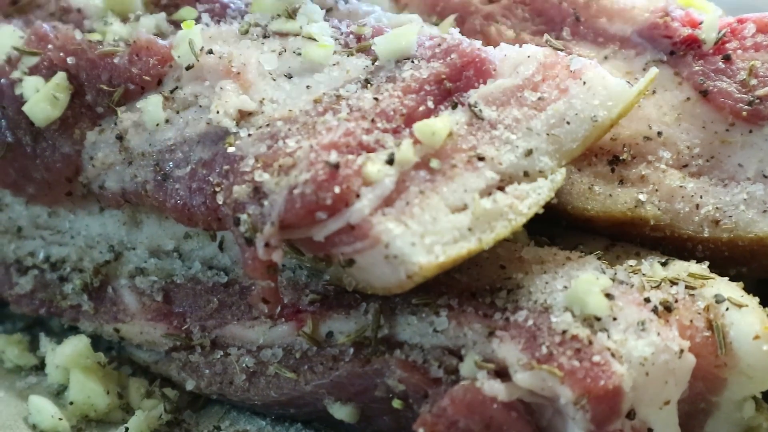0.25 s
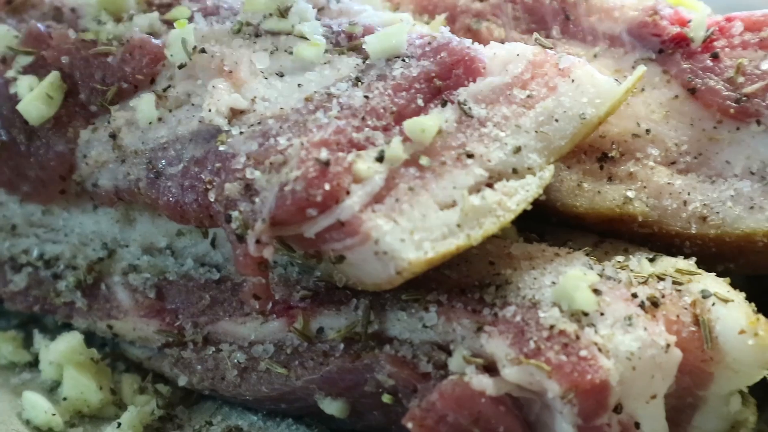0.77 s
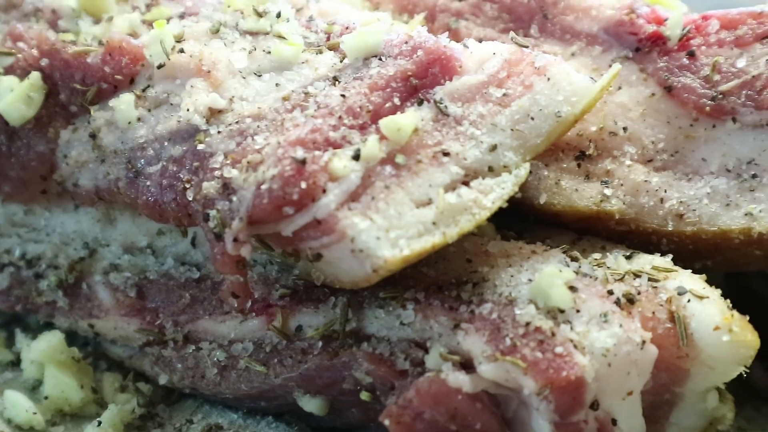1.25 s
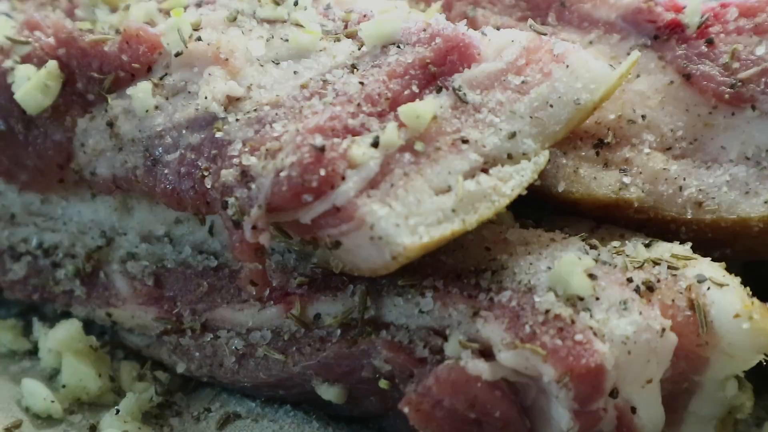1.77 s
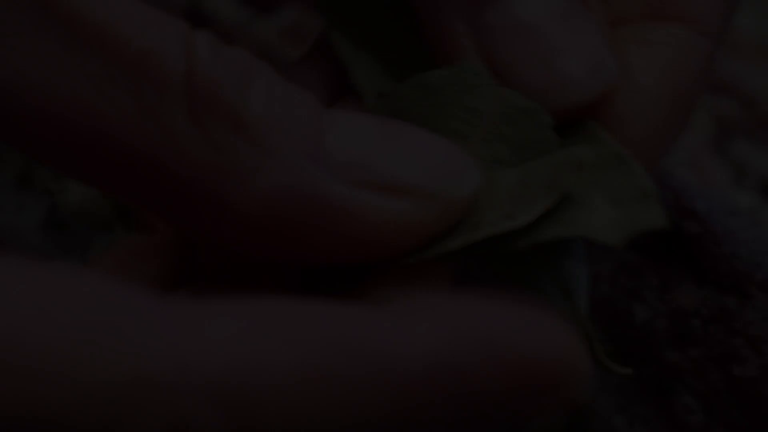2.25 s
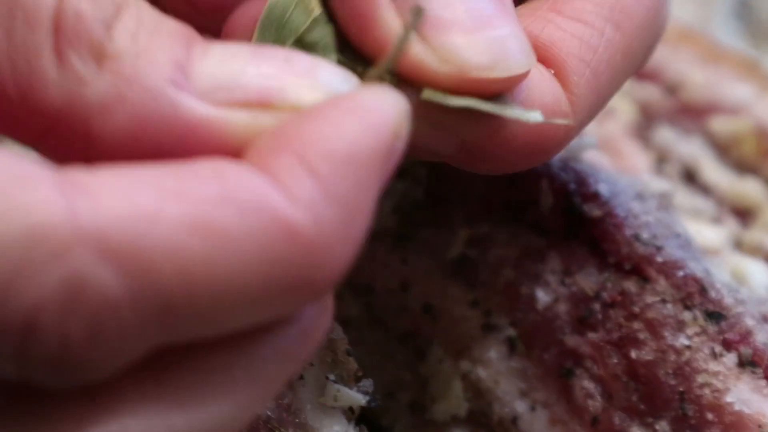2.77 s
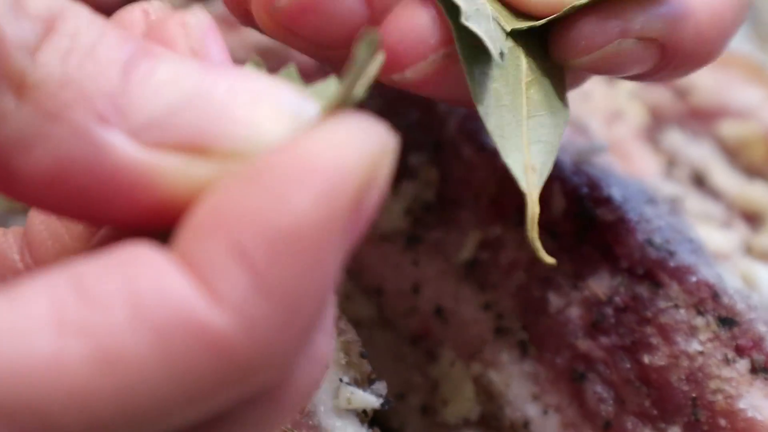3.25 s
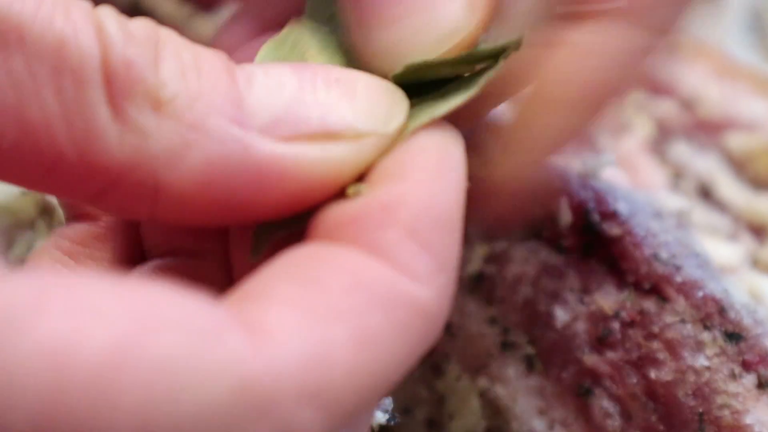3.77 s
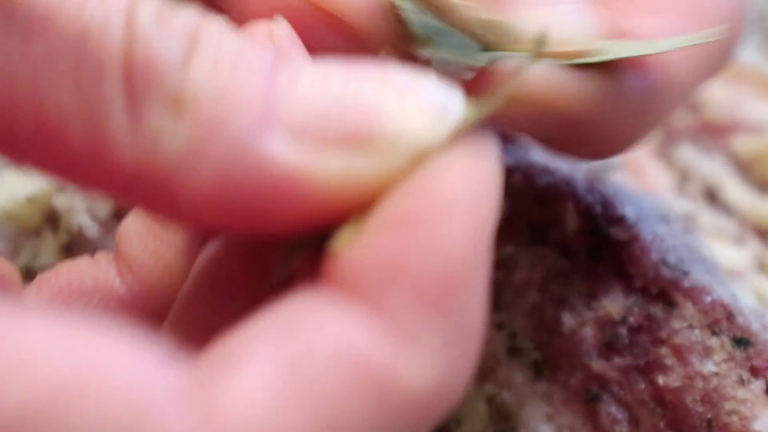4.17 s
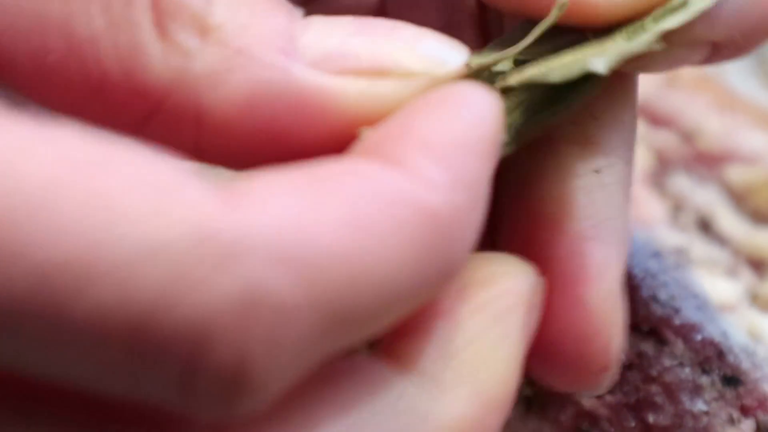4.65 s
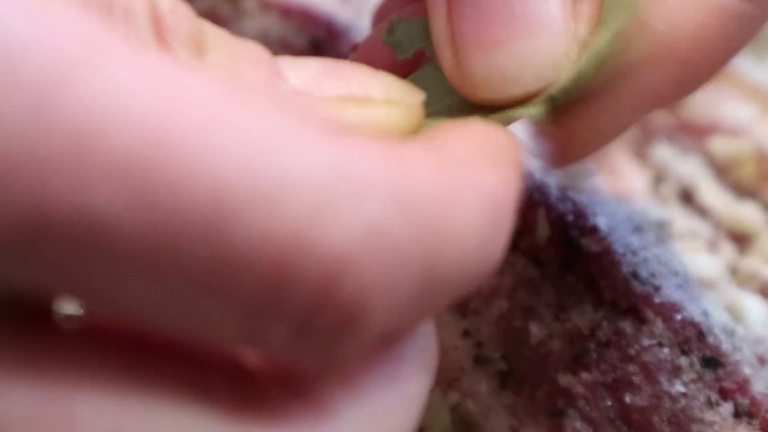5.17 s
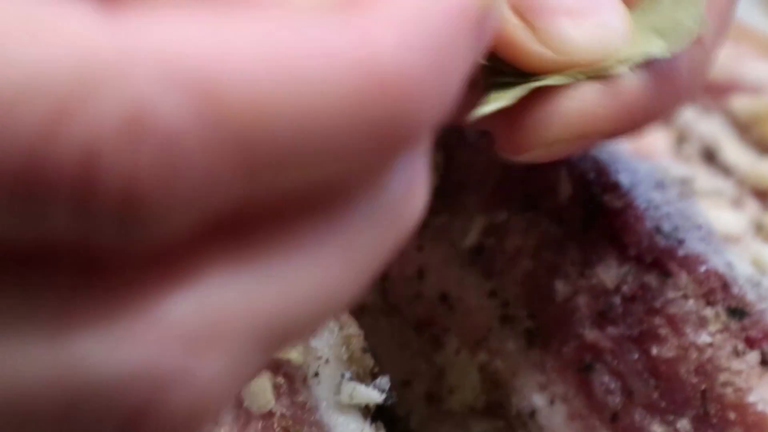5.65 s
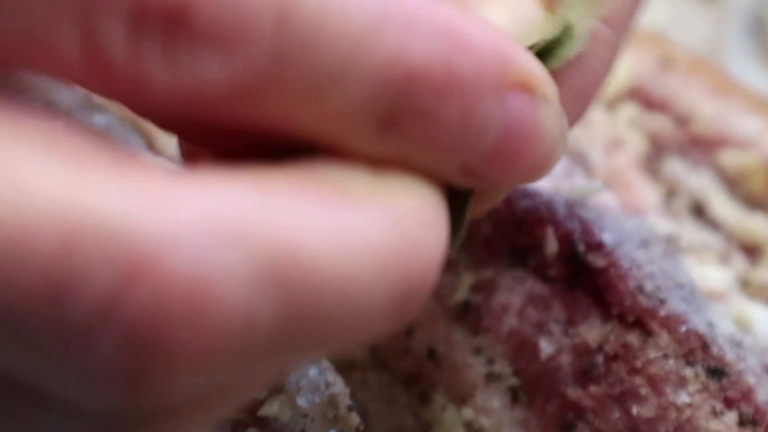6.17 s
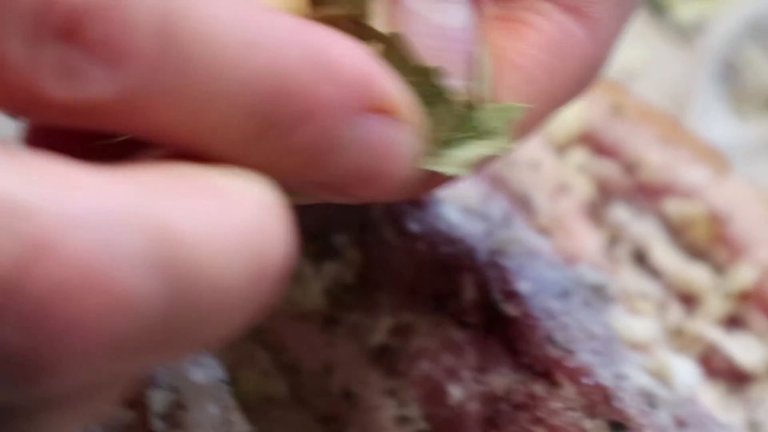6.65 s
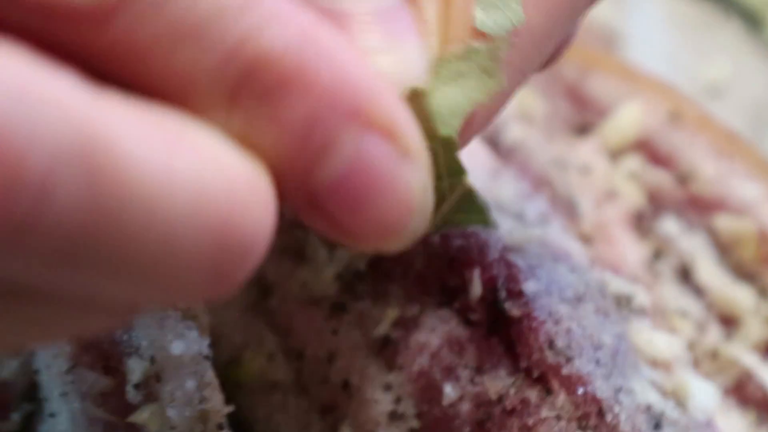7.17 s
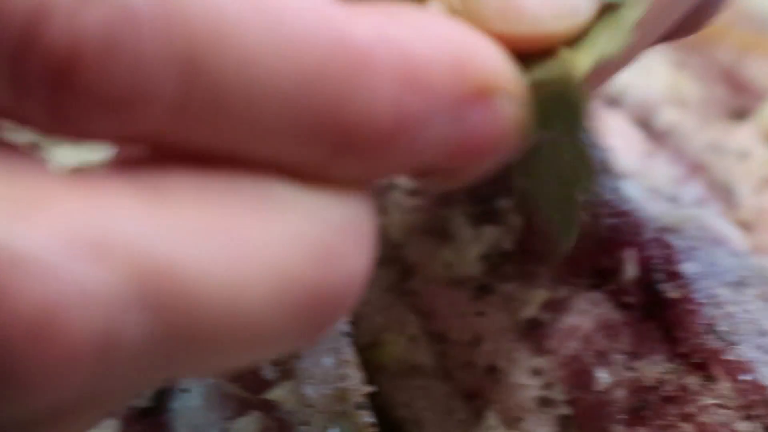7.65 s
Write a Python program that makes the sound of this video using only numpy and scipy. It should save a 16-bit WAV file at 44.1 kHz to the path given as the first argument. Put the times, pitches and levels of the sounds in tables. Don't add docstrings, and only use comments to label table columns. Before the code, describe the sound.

After faint patters of sprinkled seasoning, fingers crumble dry leaves up close in uneven bursts of sharp, crisp cracks and papery rustling in a quiet kitchen.

```python
import sys
import numpy as np
from scipy import signal
from scipy.fft import rfft, irfft, next_fast_len
from scipy.io import wavfile
from scipy.ndimage import uniform_filter1d, minimum_filter1d, map_coordinates

SR = 44100
rng = np.random.default_rng(int(sys.argv[2]) if len(sys.argv) > 2 else 0)


def wrap_up_sound(samples):
    columns = np.atleast_2d(samples).T
    tamed = np.clip(columns, -1, 1)
    steps = np.round(tamed * 32767).astype(np.int16)
    wavfile.write(sys.argv[1], SR, steps)


def decibels_to_gain(level_db):
    exponent = np.asarray(level_db, float) / 20
    return 10 ** exponent


N = 349272

# pitch_hz, density_db [dB per Hz]
AIR_SPECTRUM = [(15, -36), (25, -15), (49, -11), (326, 0), (3090, -6), (9520, -24.5), (11500, -23),
                (12800, -47), (15000, -53)]
# pitch_hz, side_over_mid_db
FAR_WIDTH = [(40, -5), (150, 10), (700, 5.5), (1290, 5.5), (2380, -0.5), (8120, -2.5), (15000, -2)]
# pitch_hz, t60_s
WALL_DECAY = [(500, 0.14), (2000, 0.16), (6000, 0.12), (14000, 0.014)]
# start_s, peak_db
VEIN_THUMPS = [
    (2.196, -56),
    (2.503, -50.5),
    (5.739, -53),
    (6.66, -51),
    (6.84, -53),
]
# start_s, peak_db, pitch_hz, decay_cycles [cycles to -60 dB]
HAND_BUMPS = [(2.141, -32, 210, 3.4), (2.291, -36, 238, 9.4), (2.5, -23, 265, 5), (4.749, -26, 190, 4),
              (4.7792, -14, 191, 2.5), (5.161, -24.5, 250, 7.1), (6.656, -29, 110, 3.3),
              (6.70, -36, 170, 3.8), (6.786, -29, 180, 4.8), (6.826, -23, 260, 3.1), (6.874, -20, 220, 2.3),
              (7.224, -19, 196, 4.3), (7.223, -19, 420, 5.1), (7.315, -28, 250, 2.7), (7.38, -27.5, 245, 8)]
# time_s, level_db
HAND_GRIP = [(1.9, -85), (2.15, -70), (2.6, -75.5), (3.4, -80), (4.0, -68), (4.6, -68), (5.0, -76),
             (5.45, -64.5), (5.7, -71.5), (6.2, -69), (6.8, -63.5), (7.05, -68.5), (7.25, -64),
             (7.45, -65.5), (7.92, -66.5)]
# pitch_hz, density_db [dB per Hz]
SKIN_SPECTRUM = [(18, -43), (30, -54), (90, -13.5), (314, -2.5), (394, -4), (587, -7), (900, -5.5),
                 (1170, -49), (1980, -120)]
# start_s, length_s, level_db
SEASONING_SHAKES = [
    (0, 0.089, -69),
    (0.195, 0.11, -65),
    (0.383, 0.39, -66),
    (0.94, 0.32, -65.5),
    (1.152, 0.062, -59.5),
    (1.298, 0.34, -66),
]
# pitch_hz, density_db [dB per Hz]
GRAIN_SPECTRUM = [(710, -14), (1200, -10), (2000, -5), (3500, -8.5), (6000, -6), (9000, -11),
                  (14200, -21.5), (16000, -40)]
# start_s, length_s, pitch_hz, level_db
EDGE_SCRAPES = [
    (4.39, 0.078, 3850, -55.5),
    (7.353, 0.048, 1190, -55),
    (7.434, 0.026, 1140, -45),
]
# pitch_hz, side_over_mid_db
CLOSE_WIDTH = [(60, -13), (380, -7.5), (700, -5), (2380, -4.5), (4400, -2.5), (15000, -1)]
# pitch_hz, density_db [dB per Hz]
RUB_SPECTRUM = [(150, -52), (500, -9.5), (1200, -6), (1600, -1.5), (2400, -1.5), (3000, -9), (5000, -10),
                (16000, -43.5)]
# pitch_hz, density_db [dB per Hz]
CRACK_SPECTRUM = [(300, -47.5), (1470, -18), (2500, -14.5), (2880, -2.5), (4240, 0.5), (7550, -2),
                  (11000, -7), (15400, -16.5), (16500, -31.5)]
# pitch_hz, gain_db
FLAKE_RADIATION = [(20, -75.5), (200, -12.5), (450, -6.5), (700, -1), (16000, 5.5), (17000, -9)]
# release_s, build_up_s, rubbing_db, crackle_db
EARLY_SQUEEZES = [(2.0, 0.072, -57, -72), (2.13, 0.21, -55.5, -59), (2.34, 0.056, -46, -61),
                  (2.471, 0.18, -54, -62.5), (2.66, 0.2, -49, -66), (2.702, 0.074, -38.5, -53),
                  (2.85, 0.03, -42, -34), (3.14, 0.12, -43, -51.5), (3.74, 0.074, -45, -64),
                  (3.87, 0.23, -48, -60.5), (3.943, 0.1, -46, -67), (4.05, 0.065, -49, -66),
                  (4.164, 0.053, -44.5, -45.5), (4.285, 0.05, -38, -46), (4.453, 0.063, -56, -69.5),
                  (4.609, 0.034, -45.5, -55), (4.707, 0.03, -49, -74), (4.93, 0.13, -51.5, -60),
                  (5.12, 0.27, -49, -61.5), (5.231, 0.16, -48.5, -74)]
# release_s, build_up_s, rubbing_db, crackle_db
LATE_SQUEEZES = [(5.299, 0.025, -48, -41), (5.443, 0.075, -35, -34), (5.671, 0.082, -50, -44.5),
                 (5.767, 0.18, -42.5, -50.5), (5.93, 0.15, -45.5, -52.5), (6.117, 0.14, -47, -43),
                 (6.351, 0.078, -63, -40.5), (6.45, 0.24, -73, -50), (6.599, 0.2, -46, -53),
                 (6.844, 0.15, -46, -41.5), (7.091, 0.07, -46.5, -48.5), (7.211, 0.053, -45.5, -40.5),
                 (7.32, 0.12, -56, -49), (7.53, 0.12, -49.5, -55), (7.63, 0.14, -55, -46),
                 (7.82, 0.086, -49.5, -51), (7.91, 0.13, -46.5, -48.5)]
# start_s, flake_hz, ring_peak_db, splinter_hz, crack_peak_db
FOLD_FRACTURES = [(1.9793, 2390, -42, 4700, -39.5), (2.0634, 1440, -34, 6800, -33.5),
                  (2.0828, 1580, -41, 4200, -50), (2.1108, 1590, -50, 4000, -25),
                  (2.1171, 1970, -29.5, 7300, -45), (2.1249, 1590, -39, 3480, -27.5),
                  (2.1394, 1660, -23.5, 7500, -20.5), (2.1968, 830, -26.5, 4400, -38),
                  (2.2637, 1550, -34, 5360, -30.5), (2.3193, 2200, -34, 3380, -32),
                  (2.3277, 2060, -31, 7050, -26.5), (2.4283, 860, -44, 4970, -39),
                  (2.5027, 2210, -8, 6000, -10), (2.7061, 1640, -23.5, 4400, -36),
                  (2.7658, 2060, -25.5, 4500, -16), (2.779, 2020, -38, 7100, -27),
                  (2.7974, 1990, -6, 8300, 1), (2.8115, 1860, -16.5, 5000, -18),
                  (2.8192, 1970, -18, 4250, -10.5), (2.837, 1600, -25, 6740, -12),
                  (2.846, 2070, -18, 3770, -14), (2.8658, 1700, -26.5, 4350, -19),
                  (2.8857, 2300, -39, 5500, -27), (2.9422, 2280, -46, 9500, -18.5),
                  (2.9474, 2300, -22, 3800, -17), (2.9553, 2370, -40, 4100, -21),
                  (2.9894, 2010, -36, 8000, -26)]
# start_s, flake_hz, ring_peak_db, splinter_hz, crack_peak_db
TEAR_FRACTURES = [(3.0427, 1660, -29, 4800, -24), (3.046, 1590, -13, 3950, -13),
                  (3.0547, 1520, -11, 3560, -12.5), (3.107, 2010, -28, 5470, -27.5),
                  (3.1312, 1920, -32, 4000, -43), (3.1403, 1210, -51, 5500, -33),
                  (3.152, 1580, -29, 3700, -44), (3.1796, 1570, -20.5, 5300, -29),
                  (3.1856, 1580, -18, 3500, -17), (3.1942, 1640, -28, 3280, -28),
                  (3.2523, 1640, -16.5, 5160, -12), (3.261, 2400, -16.5, 6600, -13.5),
                  (3.2832, 2100, -27.5, 6600, -24.5), (3.4594, 1060, -37.5, 5060, -39.5),
                  (3.6547, 2050, -34, 3520, -34), (3.6616, 1040, -32.5, 3420, -42),
                  (3.7365, 810, -32.5, 3330, -37), (3.7436, 780, -31, 5500, -50),
                  (3.7526, 1430, -26, 5550, -21), (3.916, 1950, -30.5, 5000, -43),
                  (3.939, 1680, -36, 4500, -48), (4.017, 855, -40, 4430, -30),
                  (4.0278, 1810, -18.5, 6700, -21), (4.0335, 2030, -20, 6230, -16.5),
                  (4.053, 1730, -26, 12500, -19.5), (4.1165, 2010, -29, 4300, -35),
                  (4.13, 1980, -33, 11800, -16.5), (4.1452, 1590, -32, 7800, -15),
                  (4.1687, 2100, -26.5, 4070, -31), (4.2434, 1690, -26.5, 6100, -18),
                  (4.2822, 2240, -30, 9000, -16), (4.5899, 1610, -26.5, 3580, -33),
                  (4.603, 2050, -30, 3270, -27), (4.6962, 2700, -35, 4870, -34),
                  (4.9307, 2140, -31, 4250, -27), (4.9986, 2260, -33, 3900, -35.5)]
# start_s, flake_hz, ring_peak_db, splinter_hz, crack_peak_db
CRUSH_FRACTURES = [(5.0338, 2240, -31, 4200, -35), (5.0402, 2450, -36, 3400, -40),
                   (5.1924, 2000, -33, 3900, -54), (5.2242, 2510, -38, 3900, -38),
                   (5.2664, 2640, -28.5, 4340, -19), (5.2778, 1950, -23, 3940, -12),
                   (5.2893, 1120, -26, 9000, -36), (5.3035, 2000, -34, 3980, -36),
                   (5.3471, 1960, -18.5, 5840, -7), (5.3618, 2050, -26, 6000, -13),
                   (5.382, 2410, -40, 6400, -14), (5.3903, 2410, -23, 11500, -18),
                   (5.4008, 1670, -13, 5300, -31), (5.4138, 1580, -12.5, 10200, -6.5),
                   (5.4256, 1630, -27, 6800, -15), (5.4309, 1980, -24, 6900, -11.5),
                   (5.4534, 1790, -27, 3400, -32), (5.4674, 1860, -27, 4300, -38),
                   (5.4884, 1970, -22, 4040, -18), (5.5134, 3190, -44, 9500, -34),
                   (5.532, 1900, -18.5, 3870, -9), (5.5429, 1930, -22.5, 6400, -11),
                   (5.5739, 1530, -25, 4030, -16.5), (5.6416, 3070, -35, 6960, -25.5),
                   (5.656, 2360, -31, 5330, -23), (5.7316, 940, -24.5, 3370, -20),
                   (5.742, 740, -14.5, 3840, -28), (5.7575, 2080, -28, 3400, -26),
                   (5.809, 2100, -24, 11300, -22.5), (5.8171, 2450, -27.5, 8900, -20.5),
                   (5.826, 1460, -30, 5340, -29), (5.8663, 1640, -46, 4500, -38),
                   (5.8865, 2020, -42, 6160, -19), (5.911, 2530, -24.5, 4850, -24),
                   (5.9209, 1600, -23, 3900, -13.5), (5.9294, 1810, -37, 4100, -33),
                   (5.952, 2460, -33, 5360, -26), (5.971, 1570, -48, 6600, -27)]
# start_s, flake_hz, ring_peak_db, splinter_hz, crack_peak_db
GRIND_FRACTURES = [(5.9916, 2580, -36, 3700, -27.5), (6.0154, 2560, -37, 5280, -12.5),
                   (6.0244, 2370, -33, 5300, -26), (6.068, 1710, -21, 4550, -15.5),
                   (6.0847, 1470, -26.5, 4330, -18), (6.089, 2500, -32, 5350, -16.5),
                   (6.0977, 1940, -32, 6100, -21), (6.1043, 2900, -47, 4520, -19.5),
                   (6.1192, 2710, -43, 9400, -20.5), (6.1778, 2000, -48, 6150, -35),
                   (6.224, 2490, -31, 5500, -20.5), (6.2764, 2730, -37, 6000, -34),
                   (6.307, 2350, -41, 10200, -29), (6.3145, 2580, -37, 5600, -19),
                   (6.3307, 2500, -15, 3240, -10.5), (6.3397, 2690, -44, 4100, -28),
                   (6.368, 2310, -29, 3600, -36), (6.3718, 2240, -27, 4500, -12.5),
                   (6.381, 2480, -37, 4100, -29), (6.3883, 2110, -41, 4150, -26),
                   (6.449, 2480, -52, 7300, -37), (6.4873, 2120, -29.5, 3900, -35),
                   (6.4927, 1720, -44, 3420, -33), (6.5008, 2110, -42, 4700, -28),
                   (6.5198, 2120, -20.5, 3300, -36), (6.53, 2210, -34, 3300, -33),
                   (6.5391, 2300, -21, 3260, -27), (6.5472, 2240, -45, 3580, -43),
                   (6.569, 2400, -26, 4480, -42), (6.5862, 1580, -32, 3300, -42),
                   (6.5912, 3200, -31, 3380, -39), (6.5954, 1610, -28, 3630, -20.5),
                   (6.6112, 1160, -48, 3400, -28), (6.6833, 2350, -39, 6500, -33),
                   (6.703, 2780, -39, 6330, -28), (6.731, 2130, -41, 6500, -36),
                   (6.7552, 2890, -35, 6100, -19.5), (6.767, 2520, -21, 6100, -20),
                   (6.792, 3190, -22.5, 3350, -21.5)]
# start_s, flake_hz, ring_peak_db, splinter_hz, crack_peak_db
PINCH_FRACTURES = [(6.8148, 2050, -28, 4350, -22), (6.822, 3120, -23.5, 3270, -27),
                   (6.8285, 3190, -32, 4530, -20.5), (6.8405, 2130, -38, 4400, -35),
                   (6.904, 1890, -31.5, 3700, -44), (6.9867, 2370, -42.5, 3800, -35),
                   (7.0553, 2330, -27.5, 3920, -27), (7.0795, 1940, -32, 7600, -15),
                   (7.1658, 1960, -42, 7900, -25), (7.176, 2000, -25.5, 4000, -15.5),
                   (7.183, 2200, -38, 5500, -32), (7.1993, 2140, -48, 5770, -19),
                   (7.2603, 2450, -43, 5850, -22), (7.2645, 1310, -46, 6040, -19),
                   (7.283, 1990, -30, 5600, -22.5), (7.2922, 1550, -46, 5700, -28),
                   (7.3101, 2330, -43, 6840, -31), (7.3252, 2130, -52, 6200, -32),
                   (7.3892, 2940, -36, 3320, -49), (7.3934, 2390, -39, 5670, -25.5),
                   (7.4354, 2500, -20.5, 6000, -23.5), (7.4666, 660, -34.5, 3300, -51),
                   (7.4889, 2200, -45, 3670, -31), (7.4949, 2200, -35, 9700, -23.5),
                   (7.5019, 2550, -31, 5900, -27.5), (7.5117, 2370, -35, 5600, -28),
                   (7.5296, 2370, -44, 6400, -22.5), (7.5366, 1700, -46, 10400, -28),
                   (7.5672, 2280, -36, 6350, -23), (7.5746, 2300, -24, 5760, -14),
                   (7.5836, 2540, -35, 6200, -24), (7.6256, 2170, -54, 6600, -32),
                   (7.6467, 2100, -33, 6630, -26), (7.695, 2520, -43, 3800, -36),
                   (7.7361, 2410, -43, 4930, -30), (7.785, 600, -44, 3700, -35),
                   (7.8054, 2010, -23, 3530, -15), (7.8528, 1610, -27.5, 3800, -23.5),
                   (7.864, 2540, -36, 3470, -32), (7.9068, 2090, -27, 3560, -27),
                   (7.8026, 2500, -36, 4200, -24)]
# start_s, pitch_hz, peak_db
VEIN_THUDS = [
    (2.5028, 620, -22),
    (3.2613, 840, -24),
    (3.284, 900, -30.5),
    (5, 750, -37.5),
    (7.0775, 1030, -34),
    (4.695, 800, -38),
    (2.139, 610, -25),
]
# pitch_hz, gain_db
MICROPHONE_BAND = [(20, -8), (70, 0), (15300, 0), (16800, -12), (17100, -70)]


def unit(x):
    return x / np.sqrt(np.mean(x ** 2) + 1e-20)


def along(points, hz):
    f, v = np.transpose(points)
    return np.interp(np.log(hz + 1), np.log(f + 1), v)


def grip_gain():
    s, level_db = np.transpose(HAND_GRIP)
    return decibels_to_gain(np.interp(np.arange(N) / SR, s, level_db, -140, -140))


def wobble(rate):
    knots = rng.standard_normal(int(N * rate / SR) + 4)
    return map_coordinates(knots, [np.arange(N) * rate / SR])


def coloured(x, spectrum):
    m = next_fast_len(x.shape[-1] + 4096)
    gain = decibels_to_gain(along(spectrum, np.fft.rfftfreq(m, 1 / SR)))
    ceps = irfft(np.log(gain / np.sqrt(np.mean(gain ** 2)) + 1e-6), m)
    ceps[1:m // 2] *= 2
    ceps[m // 2 + 1:] = 0
    return irfft(rfft(x, m) * np.exp(rfft(ceps)), m)[..., :x.shape[-1]]


def stereo(pair, width):
    m = next_fast_len(pair.shape[-1] + 4096)
    side_gain = decibels_to_gain(along(width, np.fft.rfftfreq(m, 1 / SR)))
    side = irfft(rfft(pair[1], m) * side_gain, m)[:pair.shape[-1]]
    return np.array([pair[0] + side, pair[0] - side])


def crackle(rate, spread_db, t60, clump_db):
    size_db = spread_db * np.minimum(rng.exponential(size=N), 3.5)
    struck = (rng.random(N) < rate / SR) * decibels_to_gain(size_db)
    fade = decibels_to_gain(-60 * np.arange(2048) / SR / t60)
    burst = signal.fftconvolve(struck * decibels_to_gain(clump_db * wobble(30)), fade)[:N]
    return unit(burst * rng.standard_normal((2, N)))


def patchy(x, depth_db):
    z = signal.stft(x, nperseg=256)[2]
    field = uniform_filter1d(rng.standard_normal(z.shape[1:]), size=7, axis=0)
    field = uniform_filter1d(field, size=14, axis=1)
    return signal.istft(z * decibels_to_gain(depth_db * unit(field)), nperseg=256)[1][:, :N]


def kitchen_air():
    hush = unit(coloured(rng.standard_normal((2, N)), AIR_SPECTRUM))
    hush = decibels_to_gain(0.5 * wobble(4)) * hush
    return stereo(decibels_to_gain(-65.5) * hush, FAR_WIDTH)


def room(x):
    wet, step = np.zeros((2, N + SR)), SR // 3
    delay = 150
    for a in range(0, N, step):
        hz, t, z = signal.stft(rng.standard_normal((2, step)), SR, nperseg=256)
        decay = decibels_to_gain(-60 * t / along(WALL_DECAY, hz)[:, None])
        tail = signal.istft(z * decay, SR, nperseg=256)[1]
        echo = signal.fftconvolve(x[None, a:a + step], tail / np.linalg.norm(tail[0]), axes=1)
        wet[:, a + delay:a + delay + echo.shape[1]] += echo
    return wet[:, :N]


def jolts():
    t, out = np.arange(N) / SR, np.zeros(N)
    for s, peak_db in VEIN_THUMPS:
        u = np.maximum(t - s, 0) / 0.0017
        out += decibels_to_gain(peak_db) * np.e * u * np.exp(-u) * (1 - u / 2)
    return out


def hands():
    lumps = decibels_to_gain(2.8 * wobble(35) + 4)
    slide = grip_gain() * lumps * unit(coloured(rng.standard_normal((2, N)), SKIN_SPECTRUM))
    push, t = np.zeros(N + SR), np.arange(4096) / SR
    for s, db, hz, cycles in HAND_BUMPS:
        fade = decibels_to_gain(db - 60 * t * hz / cycles)
        onset = 1 - np.exp(-t * hz * 25)
        push[round(s * SR):][:len(t)] += fade * np.sin(2 * np.pi * hz * t) * onset
    push = coloured(push[:N], [(15, -55), (60, -2.5), (120, -4.0), (400, 5.0), (1500, 0.5), (20000, -17.0)])
    opposite = push * [[1], [-1]]
    common = 0.33 * signal.hilbert(push).imag
    return stereo(slide, FAR_WIDTH) + decibels_to_gain(-14.0) * (opposite + common)


def shaking():
    t, levels = np.arange(N) / SR, []
    rise_db_s, fall_db_s, swell_db = 400, 550, 1.5
    for s, length, level_db in SEASONING_SHAKES:
        rise = rise_db_s * np.maximum(s - t, 0)
        fall = fall_db_s * np.maximum(t - s - length, 0)
        swell = swell_db * np.sin(np.pi * np.clip((t - s) / length, 0, 1))
        levels.append(level_db - rise - fall + swell)
    return decibels_to_gain(np.max(levels, axis=0))


def sprinkling():
    grains = crackle(rate=6000, spread_db=1.2, t60=0.006, clump_db=0.2)
    patter = unit(coloured(grains, GRAIN_SPECTRUM))
    return stereo(shaking() * patter, FAR_WIDTH)


def scraping():
    out = np.zeros((2, N))
    for s, length, hz, db in EDGE_SCRAPES:
        a, b = round(s * SR), round((s + length) * SR)
        resonance = [(hz / 2.5, -30), (hz, 0), (hz * 2.5, -30)]
        hiss = coloured(rng.standard_normal((2, b - a)), resonance)
        out[:, a:b] += decibels_to_gain(db) * np.sqrt(np.hanning(b - a)) * hiss
    return stereo(out, CLOSE_WIDTH)


def fractures():
    veins = [(s, hz, db, 4000, -60) for s, hz, db in VEIN_THUDS]
    return FOLD_FRACTURES + TEAR_FRACTURES + CRUSH_FRACTURES + GRIND_FRACTURES + PINCH_FRACTURES + veins


def squeezing():
    s, build, rub_db, crackle_db = np.transpose(EARLY_SQUEEZES + LATE_SQUEEZES)[..., None]
    hit, _, ring_db, _, crack_db = np.transpose(fractures())[..., None]
    t = np.arange(0, N / SR + 0.01, 0.003)
    before = np.maximum(s - t, 0) / np.maximum(build, 0.01)
    after = np.maximum(t - s, 0)
    settle = decibels_to_gain(-184 * np.maximum(t - hit, 0) - 1500 * np.maximum(hit - t, 0))

    def total(level_db, fade_db_s, tail_db):
        squeeze = decibels_to_gain(level_db - 15 * before ** 1.5 - fade_db_s * after)
        tail = decibels_to_gain(tail_db) * settle
        power = np.sum(squeeze ** 2, axis=0) + np.sum(tail ** 2, axis=0)
        return np.interp(np.arange(N) / SR, t, np.sqrt(power))

    return total(rub_db, 520, ring_db - 32), total(crackle_db, 600, crack_db - 36)


def crumbling():
    rub, fine = squeezing()
    rub = np.hypot(rub, decibels_to_gain(8) * grip_gain())
    dull = crackle(rate=2500, spread_db=1.8, t60=0.01, clump_db=1.5)
    bright = crackle(rate=1600, spread_db=2.6, t60=0.005, clump_db=1.8)
    ticks = crackle(rate=190, spread_db=3, t60=0.004, clump_db=1)
    dull = unit(coloured(dull + decibels_to_gain(-18) * ticks, RUB_SPECTRUM))
    bright = unit(coloured(bright + decibels_to_gain(-9) * ticks, CRACK_SPECTRUM))
    mix = patchy(rub * dull + fine * bright, depth_db=2.8)
    return decibels_to_gain(-2.0) * stereo(mix, CLOSE_WIDTH)


def mode(t, hz, cycles):
    return np.sin(2 * np.pi * hz * t) * decibels_to_gain(-60 * t * hz / cycles) * (1 - np.exp(-t * hz * 6))


def flake_rings(t, hz, luck, noise):
    held = t / ((0.00037 + 0.75 / hz) * (0.52 + 0.86 * luck[:, :1]))
    swing = 1.204 * held * np.exp(-held ** 2) * np.sin(2 * np.pi * hz * t)
    ring = swing + 0.36 * mode(t, hz, 7 + hz / 150)
    ring = ring + 0.17 * mode(t, hz * (1.3 + 3.6 * luck[:, 1:2]), 15.0)
    ring = np.sign(luck[:, 2:3] - 0.5) * ring
    side_share = np.sign(luck[:, 4:5] - 0.57) * (0.205 + 0.5 * luck[:, 3:4])
    rattle = coloured(noise * decibels_to_gain(-60 * t / 0.025), RUB_SPECTRUM)
    return np.stack([ring, side_share * ring], axis=1) + 0.15 * rattle


def sharp_cracks(t, splinter_hz, luck, noise):
    rise = 1 - np.exp(-t / (0.0006 * luck[:, 7:] ** 2 + 8e-5))
    fade = decibels_to_gain(-60 * t / 0.0028) + 0.09 * decibels_to_gain(-60 * t / 0.03)
    crack = coloured(noise * rise[:, None] * fade, CRACK_SPECTRUM)
    crack = crack / np.abs(crack[:, :1]).max(axis=2, keepdims=True)
    splinter = 0.49 * rise * mode(t, 3600 * 3.36 ** luck[:, 5:6], 9.9)
    splinter = splinter + 1.96 * rise * mode(t, splinter_hz, 21.7)
    return crack + 0.81 * splinter[:, None] * [[1], [-0.4]]


def snaps():
    t = np.arange(1100) / SR
    s, hz, ring_db, splinter_hz, crack_db = [c[:, None] for c in np.transpose(fractures())]
    luck = rng.random((len(s), 8))
    noise = rng.standard_normal((len(s), 2, 2, len(t)))
    pairs = decibels_to_gain(ring_db + 2.5)[:, None] * flake_rings(t, hz, luck, noise[:, 0])
    pairs = pairs + decibels_to_gain(crack_db - 4.5)[:, None] * sharp_cracks(t, splinter_hz, luck, noise[:, 1])
    place = (np.round(s * SR).astype(int) + np.arange(len(t))).ravel()
    mid, side = [np.bincount(place, pairs[:, c].ravel(), N + SR)[:N] for c in (0, 1)]
    return stereo(coloured(np.array([mid, side]), FLAKE_RADIATION), CLOSE_WIDTH)


def scene():
    leaves = snaps()
    lean_db = np.interp(np.arange(N) / SR, [6.7, 7.5], [0, 1.3])
    leaves = leaves * decibels_to_gain([-lean_db, lean_db])
    walls = decibels_to_gain(-13) * room(leaves.mean(axis=0))
    background = kitchen_air() + walls + jolts() + hands()
    return background + sprinkling() + scraping() + crumbling() + leaves


def band_limit(x):
    return signal.sosfilt(signal.butter(12, 16970, fs=SR, output="sos"), x)


def record(dry):
    peak = -minimum_filter1d(-np.abs(dry).max(axis=0), size=89)
    peak = uniform_filter1d(peak, size=45)
    limited = dry / np.maximum(peak / 0.9, 1)
    mix = decibels_to_gain(-1.2) * coloured(limited, MICROPHONE_BAND)
    return band_limit(mix)


dry = scene()
out = record(dry)
wrap_up_sound(out)
```